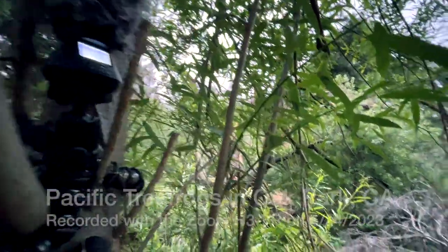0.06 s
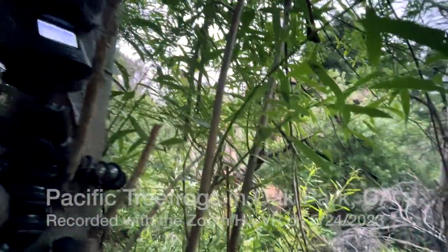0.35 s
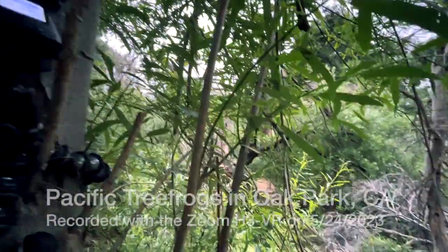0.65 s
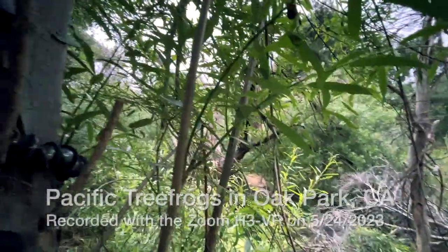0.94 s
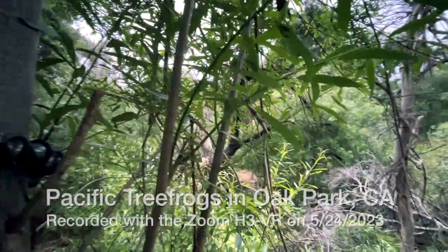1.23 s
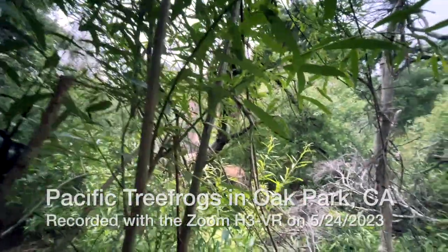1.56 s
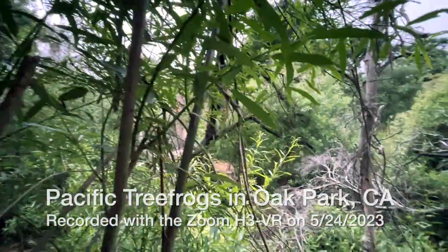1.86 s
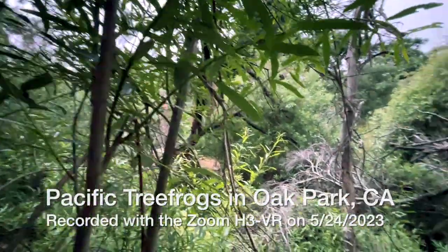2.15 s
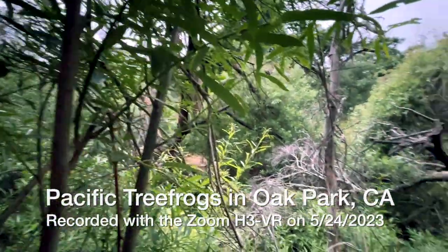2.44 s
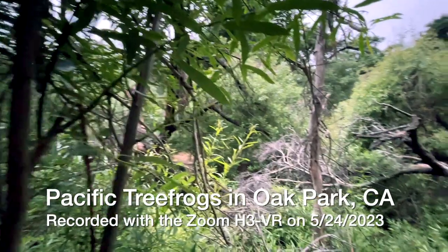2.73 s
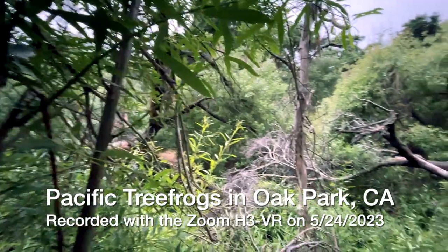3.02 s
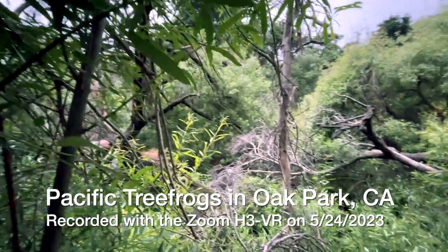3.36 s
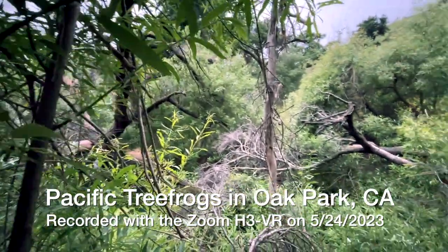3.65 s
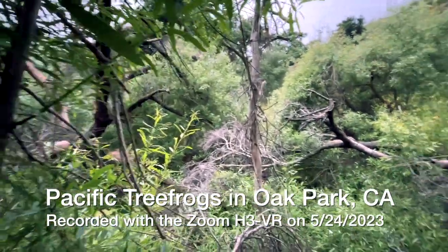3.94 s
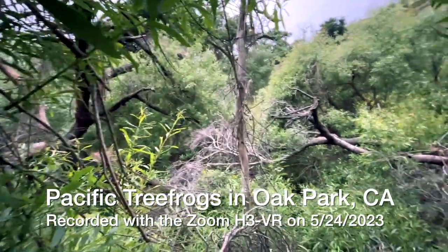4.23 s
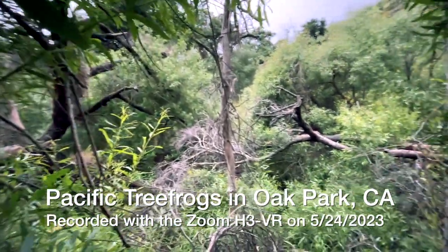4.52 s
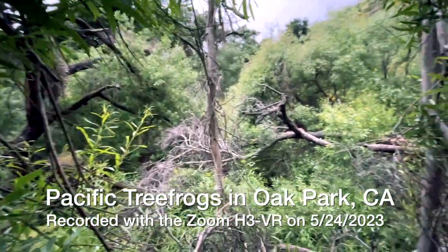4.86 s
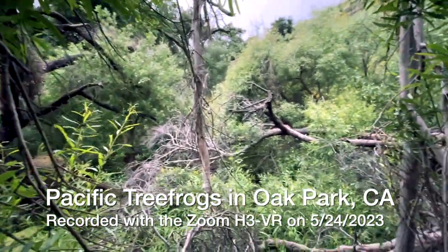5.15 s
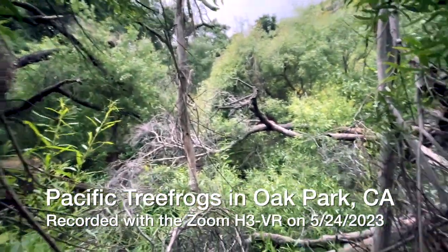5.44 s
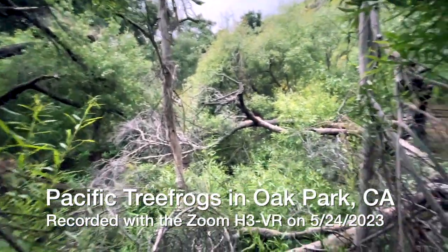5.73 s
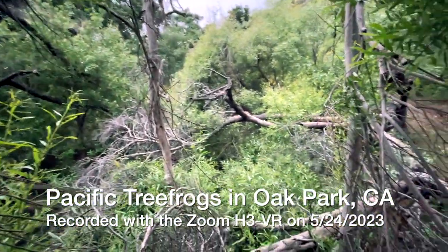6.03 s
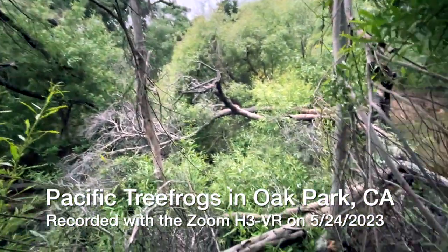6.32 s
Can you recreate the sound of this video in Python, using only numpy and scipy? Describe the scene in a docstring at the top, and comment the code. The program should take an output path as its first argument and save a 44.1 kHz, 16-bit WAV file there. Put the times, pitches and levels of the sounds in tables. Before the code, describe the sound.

Outdoors among trees and bushes, a quiet hush of air carries faint bird chirps and a barely audible distant frog chorus. One close frog croaks briefly. After a lull it calls again about once a second, and more frogs come in with woody ticking, rounder trills and peeps, growing into a busy chorus. The stereo sound places the frogs toward the left and the birds toward the right, with a short natural echo.

```python
"""In creekside brush, treefrogs call: one starts with two-part croaks, then others join with ticking
trills and peeps. Each call is a pulse train, short bursts of the vocal cords filtered by the throat sac,
which radiates the second harmonic best. The thicket scatters the calls into reverberation. Far off,
small birds chirp and rasp over a faint frog chorus and a hush of air."""
import sys
import numpy as np
from scipy import signal
from scipy.fft import rfft, irfft, next_fast_len
from scipy.io import wavfile

SR = 44100
rng = np.random.default_rng(int(sys.argv[2]) if len(sys.argv) > 2 else 0)


def inscribe(sig):
    """Save sig as 16-bit PCM at rate SR to the path in sys.argv[1].

    A 1-D sig is mono; a 2-D sig holds one channel per row.
    Samples are clipped to [-1, 1] before scaling.
    """
    pcm = np.round(np.clip(np.atleast_2d(sig).T, -1, 1) * 32767)
    wavfile.write(sys.argv[1], SR, pcm.astype(np.int16))


N = 281646


def amp(db):
    """Decibels to amplitude ratio."""
    return 10 ** (np.asarray(db) / 20)


def unit(x):
    """Normalisation to an rms of 1."""
    return x / np.sqrt(np.mean(x ** 2) + 1e-20)


def along(points, hz):
    """Interpolation of (frequency, value) points on a logarithmic frequency axis."""
    frequencies, values = np.transpose(points)
    return np.interp(np.log(hz + 1), np.log(frequencies + 1), values)


def filtered(x, response):
    """Linear filtering: the spectrum is multiplied by a frequency response."""
    n = x.shape[-1]
    padded = next_fast_len(n + SR // 10)
    return irfft(rfft(x, padded) * response(np.fft.rfftfreq(padded, 1 / SR)), padded)[..., :n]


def add(track, start_s, sound):
    """Superposition: a sound sums into the track from its start time."""
    part = track[max(round(start_s * SR), 0):][:len(sound)]
    part += sound[:len(part)]


# Spectrum of the air: frequency_hz, density_db
AIR_SPECTRUM = [(15, -31.5), (25, -19.5), (215, -3), (421, -3), (482, -3.5), (1050, -6), (1270, -6),
                (2420, -12), (2770, -10.5), (5140, -14.5), (6050, -17), (15500, -20)]
# Likeness of the air at the two ears: frequency_hz, coherence
AIR_COHERENCE = [(60, 0.67), (380, 0.47), (2380, 0.52), (15000, 0.23)]


def air():
    """Partial coherence: the hush of distant air and leaves is most alike at both ears in the bass."""
    def mid_and_side(hz):
        angle = np.arccos(along(AIR_COHERENCE, hz)) / 2
        return amp(along(AIR_SPECTRUM, hz)) * [np.cos(angle), np.sin(angle)]
    mid, side = filtered(rng.standard_normal((2, N)), mid_and_side)
    return amp(-64.03) * unit(np.array([mid + side, mid - side]))


# Spectrum of the distant frog chorus: frequency_hz, density_db
CHORUS_SPECTRUM = [(600, -39.5), (1150, -6.5), (1700, -23.5), (2300, -5.5), (2550, -5.5), (2900, -11.5),
                   (4000, -27), (8000, -57.5)]


def chorus():
    """Incoherent summation: many distant frogs blur into noise bands at their two harmonics."""
    noise = rng.standard_normal((2, N))
    return amp(-76.5) * unit(filtered(noise, lambda hz: amp(along(CHORUS_SPECTRUM, hz))))


# Chirps of small birds: start_s, length_s, start_hz, end_hz, level_db
BIRD_CHIRPS = [(0.051, 0.027, 5280, 6220, -67.5), (.22, 0.082, 5770, 4520, -70),
               (.515, .045, 5050, 3770, -68), (0.623, 0.033, 5130, 3800, -65.5),
               (0.719, 0.056, 5300, 3550, -64.5), (0.837, 0.017, 7370, 5920, -64),
               (0.907, 0.11, 6320, 3660, -68.5), (1.034, 0.015, 4950, 5400, -68),
               (1.312, 0.018, 5300, 6800, -72)]


def bird_chirps():
    """Frequency modulation: each chirp is a pure tone that glides with a slight quaver."""
    song = np.zeros(N)
    distant_chips = [(6.2 * when, .015, 4500 + 2500 * first, 4500 + 2500 * last, -75)
                     for when, first, last in rng.random((45, 3))]
    for start_s, length_s, start_hz, end_hz, level_db in BIRD_CHIRPS + distant_chips:
        progress = np.linspace(0, 1, round(length_s * SR))
        quaver = np.interp(progress, np.linspace(0, 1, 12), rng.standard_normal(12))
        hz = start_hz + (end_hz - start_hz) * progress + 70 * quaver
        envelope = np.sqrt(abs(np.sin(np.pi * progress)))
        add(song, start_s, amp(level_db) * envelope * np.sin(2 * np.pi * np.cumsum(hz) / SR))
    return song


def thicket(voice, left_db, near_db, far_db):
    """Multiple scattering: direct sound, quick reflections from stems and a longer wash from trees."""
    near_rt60_s, far_rt60_s = .092, .53
    colour = [(1100, -4), (2500, -3.5), (7000, 2.5)]  # frequency_hz, gain_db
    t, clock = np.arange(SR // 2) / SR, np.arange(N) / SR
    ears = voice * amp([[left_db / 2], [-left_db / 2]])
    for second in range(int(clock[-1]) + 2):  # the paths drift as the listener turns
        crossfade = np.sqrt(np.clip(1 - abs(clock - second), 0, 1))
        live = np.flatnonzero(crossfade)
        noise = rng.standard_normal((2, len(t))) + rng.standard_normal(len(t))
        near = unit(noise * amp(-60 * t / near_rt60_s) * (t > .002))
        far = unit(noise * amp(-60 * t / far_rt60_s) * (t > .015))
        paths = (amp(near_db) * near + amp(far_db) * far) / np.sqrt(len(t))
        paths = filtered(paths, lambda hz: amp(along(colour, hz)))
        for ear, path in zip(ears, paths):
            add(ear, clock[live[0]], signal.fftconvolve((voice * crossfade)[live], path))
    return ears


def pulse_trains(calls, period_s, slowing, crest, climb, lengthen, uneven_db, uneven_pitch):
    """Pulse modulation: pitch climbs through a call, and bursts lengthen as effort builds to a crest."""
    bursts = []
    for start_s, count, crest_db, swell_db, fade_db, pitch_hz, burst_s in calls:
        progress = np.linspace(0, 1, round(count))
        times = start_s + np.arange(len(progress)) * (period_s + slowing * start_s)
        louder, higher = rng.uniform(-1, 1, (len(progress), 2)).T
        building = np.maximum(1 - progress / crest, 0)
        easing = np.maximum(progress - crest, 0) / (1 - crest)
        db = crest_db - swell_db * building ** 1.8 - fade_db * easing ** 2 + uneven_db * louder
        hz = pitch_hz * (1 + climb * (progress - .5) + uneven_pitch * higher)
        lengths = burst_s * np.exp(lengthen * (.5 - building))
        bursts += zip(times, db, hz, lengths)
    return bursts


def frog_voice(bursts, harmonics_db, throat, rise, shape, sag, droop, rasp_db, highpass_hz, jitter):
    """Source and filter: each puff of air swings the vocal cords briefly; the throat sac colours it."""
    voice, t = np.zeros(N), np.arange(SR // 33) / SR
    order = np.arange(1, len(harmonics_db) + 1)
    upper = order > 2
    for start_s, level_db, pitch_hz, length_s in bursts:
        envelope = (1 - np.exp(-t / (rise * length_s))) * np.exp(-(t / length_s) ** shape)
        # in short bursts the body wall rings a little under the fundamental
        multiples = order - sag * np.exp(-length_s / .006) * (order == 1)
        # no two swings of the cords last equally long, which smears the upper harmonics
        uneven = np.interp(t * pitch_hz, np.arange(len(t)), rng.standard_normal(len(t)))
        slack = droop * (.5 - np.minimum(t / length_s, 2))  # pitch drops as the puff runs out
        cycles = pitch_hz * np.cumsum(1 + slack + jitter * uneven) / SR
        gains = amp(harmonics_db + 2 * rng.standard_normal(len(order)) * upper)
        lags = rng.uniform(0, 1, len(order)) * upper
        tone = gains @ np.sin(2 * np.pi * (np.outer(multiples, cycles) + lags[:, None]))
        rasp = amp(rasp_db) * signal.lfilter([1], [1, -.7], rng.standard_normal(len(t)))
        onset_s = start_s + rng.uniform(-.0006, .0003)
        add(voice, onset_s, amp(level_db) * envelope / envelope.max() * (tone + rasp))
    # so small an animal radiates no bass, and leaves absorb the very top
    voice = signal.sosfilt(signal.butter(7, highpass_hz, 'high', fs=SR, output='sos'), voice)
    leaves = lambda hz: 1 / np.sqrt(1 + (hz / 10500) ** 12)
    return filtered(voice, lambda hz: amp(along(throat, hz)) * leaves(hz))


# Harmonics of the ticking frog, fundamental first: level_db
TICK_HARMONICS = [-6.5, 2.5, -17, -28, -32, -30]
# Response of its throat sac: frequency_hz, gain_db
TICK_THROAT = [(1150, -4), (1550, -0.5), (1950, -4.5), (2500, -5.5), (3100, -2), (3600, -6), (4200, 1.5),
               (4700, -10.5), (5100, 0.5), (6300, -4), (6850, -5), (7400, -15.5), (12500, -4.5)]
# Swells of its trill: start_s, burst_count, crest_db, swell_db, fade_db, pitch_hz, burst_s
TICK_TRAINS = [(0.369, 1, -35.5, -3, 0, 940, 0.00044), (2.441, 29, -18, 17, 5.4, 1131, 0.0021),
               (3.813, 17, -16.5, 12.5, -1.8, 1117, 0.0031), (4.239, 5, -18.5, -6, 2.4, 1222, 0.0044),
               (4.881, 22, -17, 8, 1.5, 1177, 0.0024), (6.142, 10, -21, 9.5, -2.03, 1077, 0.0027)]


def ticking_frog():
    """Transient excitation: an abrupt onset spreads each burst's spectrum into a dry, woody tick."""
    bursts = pulse_trains(TICK_TRAINS, period_s=.0246, slowing=.0001, crest=.87, climb=.17,
                          lengthen=.079, uneven_db=.6, uneven_pitch=.008)
    voice = frog_voice(bursts, TICK_HARMONICS, TICK_THROAT, rise=.09, shape=2.14, sag=.0033,
                       droop=.022, rasp_db=-34.5, highpass_hz=1060, jitter=.055)
    return amp(-1.9) * thicket(voice, left_db=3, near_db=-7.5, far_db=-8.5)


# Harmonics of the nearest frog, fundamental first: level_db
CROAK_HARMONICS = [-4, 4.5, -18, -34, -65, -26]
# Throat sac response of all the croaking frogs: frequency_hz, gain_db
CROAK_THROAT = [(1150, -2), (1550, 2), (1950, -3.5), (2500, -2), (3300, -3), (4200, 1.5), (4750, -5),
                (7000, -9.5), (8200, -10.5), (12500, -12)]
# First part of each croak: start_s, burst_count, crest_db, swell_db, fade_db, pitch_hz, burst_s
CROAK_TRAINS = [(0.398, 4, -31.5, 4, 1, 1123, 0.0036), (2.045, 14, -29, 9.5, -5, 1088, .0028),
                (2.526, 7, -26, 27, -2.5, 1116, 0.0027), (3.312, 12, -22.5, 15, 23, 1121, 0.0041),
                (4.431, 13, -20.5, 17, 10.5, 1117, 0.0039), (5.549, 13, -24, 6, 11, 1123, 0.0045),
                (6.309, 6, -28.5, 11, -3, 1053, 0.0029)]
# Loud closing notes: start_s, level_db, pitch_hz, length_s, push_delay_s, push_gain_db
CROAK_ENDINGS = [(0.494, -22.5, 1164, 0.0083, .004, -11.5), (2.216, -25, 1254, 0.0029, 0.0034, -5),
                 (2.663, -20, 1192, 0.0066, .007, -4.5), (3.462, -16.5, 1157, 0.0079, 0.011, -5),
                 (4.635, -17.5, 1165, 0.0068, .012, 0), (5.721, -17, 1256, 0.0045, .007, -0.5),
                 (5.737, -16.5, 1196, 0.0078, 0.0091, -4.5)]


def nearest_frog():
    """Roughness: rapid bursts fuse into a croak, closed by a long burst with a second push of air."""
    bursts = pulse_trains(CROAK_TRAINS, period_s=.0116, slowing=.00029, crest=.87, climb=.05,
                          lengthen=.31, uneven_db=4, uneven_pitch=.02)
    for start_s, level_db, pitch_hz, length_s, push_delay_s, push_gain_db in CROAK_ENDINGS:
        bursts.append((start_s, level_db, pitch_hz, length_s))
        bursts.append((start_s + push_delay_s, level_db + push_gain_db, pitch_hz, length_s))
    voice = frog_voice(bursts, CROAK_HARMONICS, CROAK_THROAT, rise=.18, shape=2.43, sag=.12,
                       droop=.063, rasp_db=-26, highpass_hz=852, jitter=.03)
    return amp(-3.5) * thicket(voice, left_db=2.6, near_db=-7.5, far_db=-14)


# Hoarse bird cries: start_s, level_db
BIRD_RASPS = [(.40, -62.5), (2.149, -61.5), (3.898, -63.5), (5.32, -62.5)]


def bird_rasps():
    """Noise modulation: wide sidebands on a sinking tone make a hiss, narrow ones a longer whistle."""
    song, t = np.zeros(N), np.arange(SR // 2) / SR
    carrier = np.sin(2 * np.pi * np.cumsum(4400 + 1700 * np.exp(-t / .34)) / SR)
    attack = 1 - np.exp(-t / .0024)

    def noise_band(width_hz):
        return unit(filtered(rng.standard_normal(len(t)), lambda hz: np.exp(-(hz / width_hz) ** 2)))
    for start_s, level_db in BIRD_RASPS:
        hiss = noise_band(width_hz=2600) * np.exp(-t / .16)
        whistle = amp(-7) * noise_band(width_hz=49) * np.exp(-t / .21)
        add(song, start_s, amp(level_db + 1.5) * attack * (hiss + whistle) * carrier)
    return song


# Harmonics of the distant and the answering frogs, fundamental first: level_db
NEIGHBOUR_HARMONICS = [-9.5, 1.5, -24.5, -38, -54, -40.5]
# Croaks from further off: start_s, length_s, burst_rate_hz, peak_db, pitch_hz
DISTANT_CROAKS = [(0.748, 0.5, 70, -65.5, 1270), (3.337, 0.2, 72.6, -32, 1214),
                  (3.778, 0.54, 36, -36.5, 1193), (4.478, 0.18, 71.3, -27, 1158),
                  (4.871, 0.14, 99, -39, 1150), (5.539, .25, 85, -27.5, 1155),
                  (5.858, 0.31, 71, -33.5, 1200), (6.265, 0.091, 92, -34.5, 1115)]


def distant_frogs():
    """Reverberant field: far croaks swell, rise in pitch and fade, with much of their sound scattered."""
    bursts = []
    for start_s, length_s, burst_rate_hz, peak_db, pitch_hz in DISTANT_CROAKS:
        offsets = np.arange(0, length_s, 1 / burst_rate_hz)
        for offset_s, (late, louder, higher) in zip(offsets, rng.standard_normal((40, 3))):
            progress = offset_s / length_s
            db = peak_db - 24 * (progress - .55) ** 2 + 1.5 * louder
            hz = pitch_hz * (.949 + .18 * progress + .028 * higher)
            bursts.append((start_s + offset_s + .001 * late, db, hz, .003))
    voice = frog_voice(bursts, NEIGHBOUR_HARMONICS, CROAK_THROAT, rise=.046, shape=9.1, sag=.022,
                       droop=.038, rasp_db=-25.5, highpass_hz=770, jitter=.055)
    return thicket(voice, left_db=4.5, near_db=-.5, far_db=-5)


# Answering croaks: start_s, burst_count, crest_db, swell_db, fade_db, pitch_hz, burst_s
ANSWER_TRAINS = [(3.160, 4, -24, 3, -3, 1254, 0.0019), (3.320, 6, -27, 10, -7, 1090, 0.0019),
                 (3.489, 5, -25, -3.5, -1, 1166, 0.0036), (4.599, 8, -22, -1.5, 2.5, 1240, .0035),
                 (4.820, 7, -35, 4, -8, 1060, 0.002), (4.925, 6, -26, 5, 10, 1182, 0.003),
                 (5.763, 4, -34.5, -12.5, -2.5, 1225, 0.0037), (5.836, 3, -28.5, 5, 9, 1384, 0.0049),
                 (5.904, 8, -25, 7.5, 8, 1210, 0.0027), (6.039, 6, -24.5, -0.5, 0, 1285, 0.0039),
                 (6.292, 3, -33, -5, 0, 1250, .004)]
# Single drawn-out bursts: start_s, level_db, pitch_hz, length_s
ANSWER_PEEPS = [(3.508, -26.5, 1376, 0.0061), (4.387, -30.5, 1220, 0.003), (4.412, -28.5, 1320, 0.0089),
                (4.902, -29, 1280, 0.005), (4.971, -27, 1169, 0.0051), (5.014, -24, 1290, 0.0043),
                (5.037, -25, 1408, 0.012), (5.825, -27, 1370, 0.007), (5.932, -29.5, 1299, 0.019),
                (6.027, -25, 1420, 0.0057), (6.381, -17.5, 1390, 0.0057)]


def answering_frogs():
    """Duration sets bandwidth: trains of short bursts croak, while one long burst is a clear peep."""
    bursts = pulse_trains(ANSWER_TRAINS, period_s=.0126, slowing=0, crest=.86, climb=.047,
                          lengthen=.1, uneven_db=.5, uneven_pitch=.027) + ANSWER_PEEPS
    voice = frog_voice(bursts, NEIGHBOUR_HARMONICS, CROAK_THROAT, rise=.18, shape=2.1, sag=.022,
                       droop=.059, rasp_db=-27, highpass_hz=865, jitter=.03)
    return thicket(voice, left_db=4, near_db=-2.5, far_db=-10.5)


# Harmonics of the trilling frog on the left, fundamental first: level_db
TRILL_HARMONICS = [-9, 0, -28.5, -35, -48.5, -59]
# Response of its throat sac: frequency_hz, gain_db
TRILL_THROAT = [(1150, -2.5), (1550, 0), (1950, -2.5), (2600, 1.5), (3200, 1.5), (4100, 0.5), (4700, 9),
                (5500, -13), (6800, -11), (8200, -16), (12500, -7)]
# Swells of its trill: start_s, burst_count, crest_db, swell_db, fade_db, pitch_hz, burst_s
TRILL_TRAINS = [(3.658, 8, -24.5, 15, 1, 1254, 0.0016), (3.872, 7, -23, -2.5, 1, 1277, .0026),
                (4.061, 4.38, -19, -3, 3, 1306, 0.0028), (5.389, 6, -16.5, 5.5, 5, 1296, 0.003),
                (5.553, 6, -16.5, 7, 5.5, 1319, 0.0017)]


def trilling_frog():
    """Damped oscillation: each burst builds gently and rings out, so the trill sounds round."""
    bursts = pulse_trains(TRILL_TRAINS, period_s=.0272, slowing=0, crest=.92, climb=.04,
                          lengthen=.35, uneven_db=2.5, uneven_pitch=.023)
    voice = frog_voice(bursts, TRILL_HARMONICS, TRILL_THROAT, rise=.8, shape=1.26, sag=.12,
                       droop=.0063, rasp_db=-28, highpass_hz=932, jitter=.03)
    return thicket(voice, left_db=7, near_db=-5, far_db=-14)


def scene():
    """Superposition: frogs to the left, birds to the right, the chorus and the air behind them."""
    frogs = ticking_frog() + nearest_frog() + distant_frogs() + answering_frogs() + trilling_frog()
    birds = thicket(bird_chirps() + bird_rasps(), left_db=-9.5, near_db=2.5, far_db=-2.5)
    return air() + chorus() + birds + frogs


def record(dry):
    """Band limiting: nothing passes above the cutoff, and a short fade ends the sound softly."""
    cutoff_hz, fade_s = 15800, .008
    fade = np.minimum(np.arange(N)[::-1] / (fade_s * SR), 1)
    return filtered(dry * fade, lambda hz: hz < cutoff_hz)


dry = scene()
out = record(dry)
inscribe(out)
```